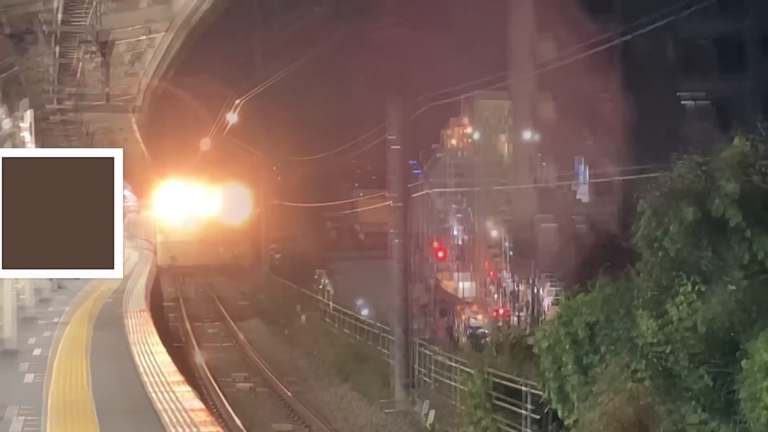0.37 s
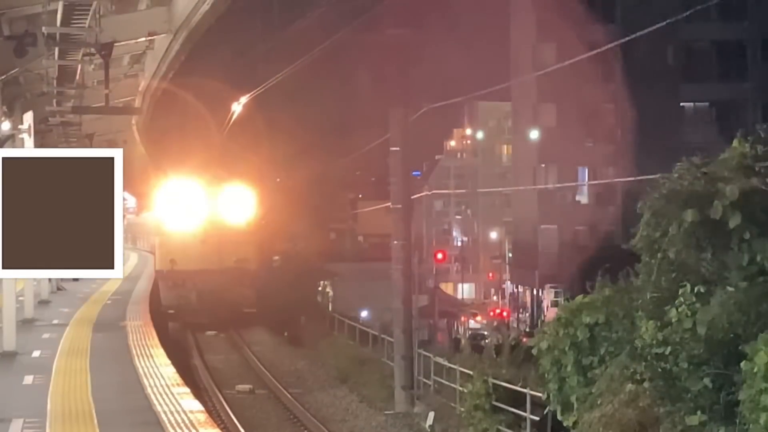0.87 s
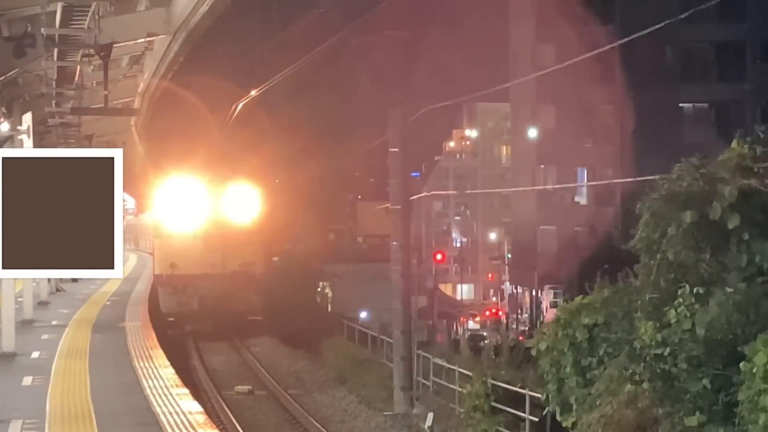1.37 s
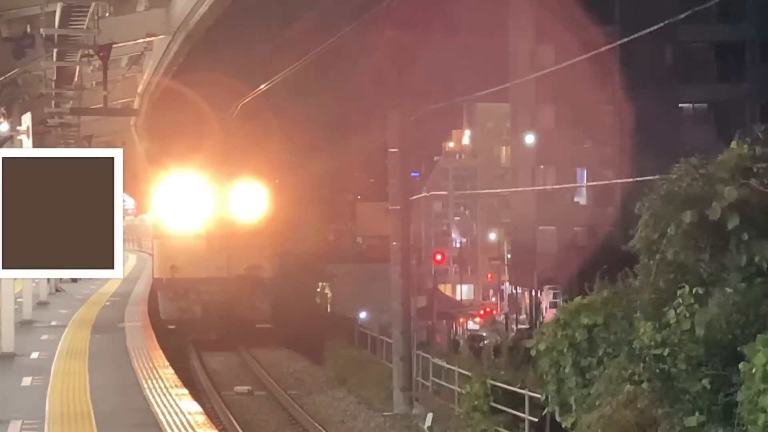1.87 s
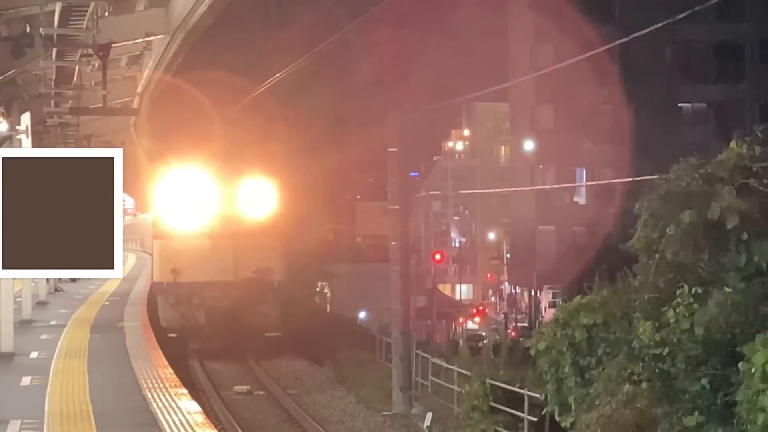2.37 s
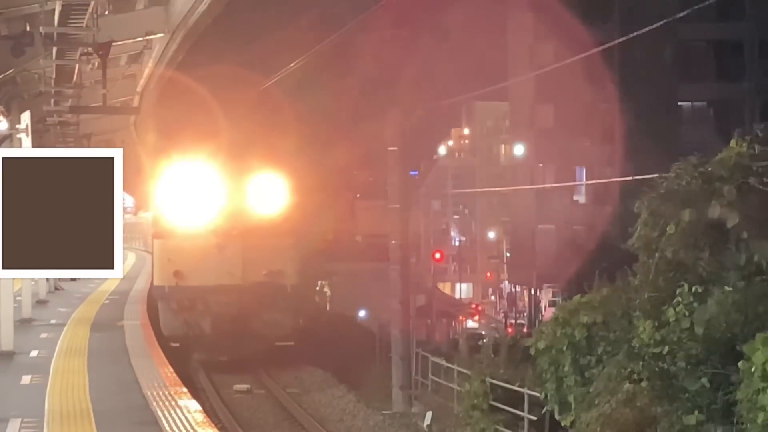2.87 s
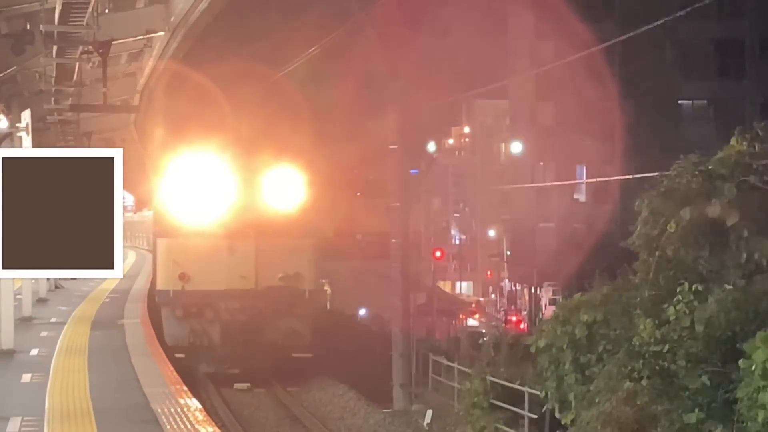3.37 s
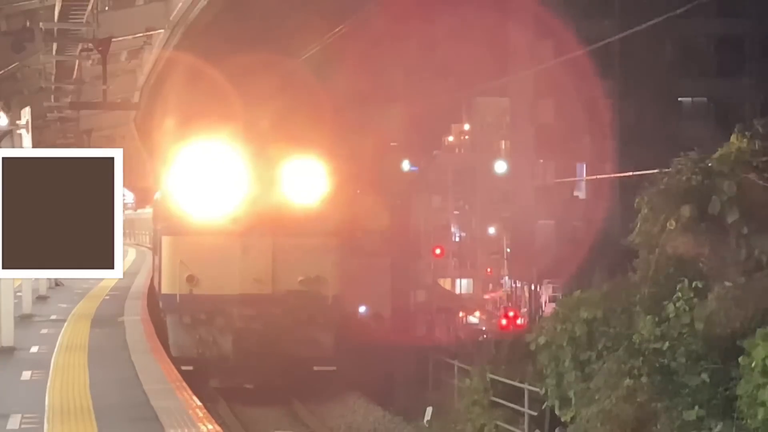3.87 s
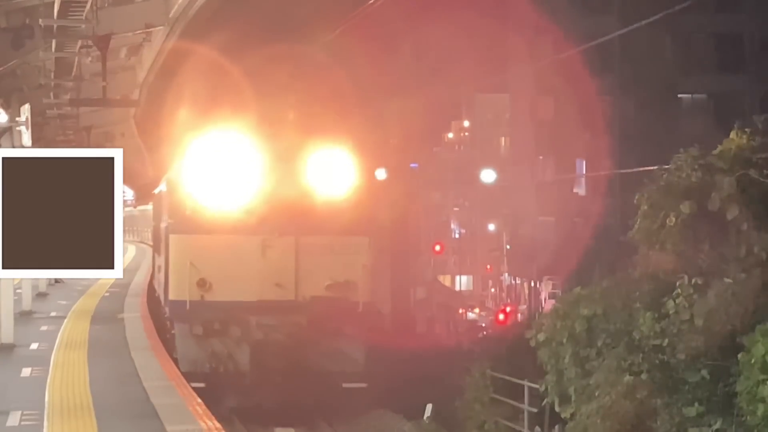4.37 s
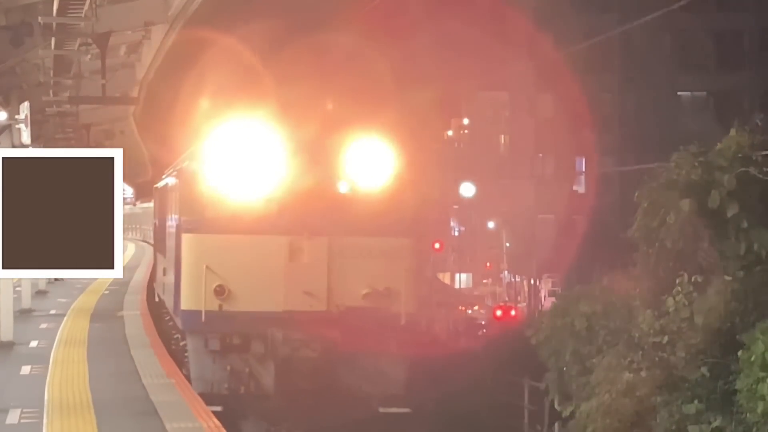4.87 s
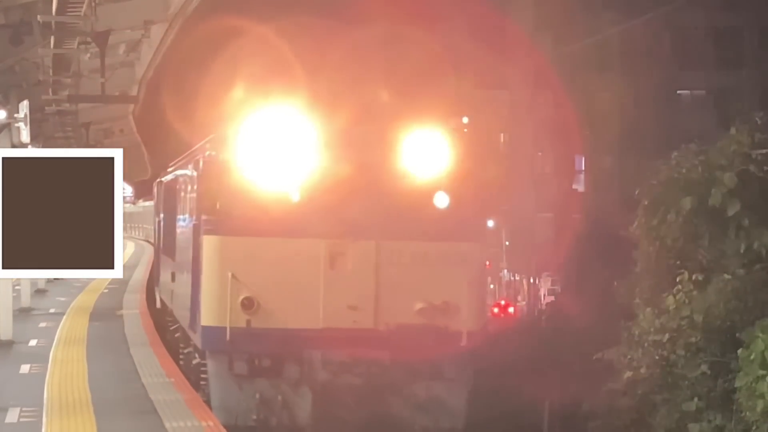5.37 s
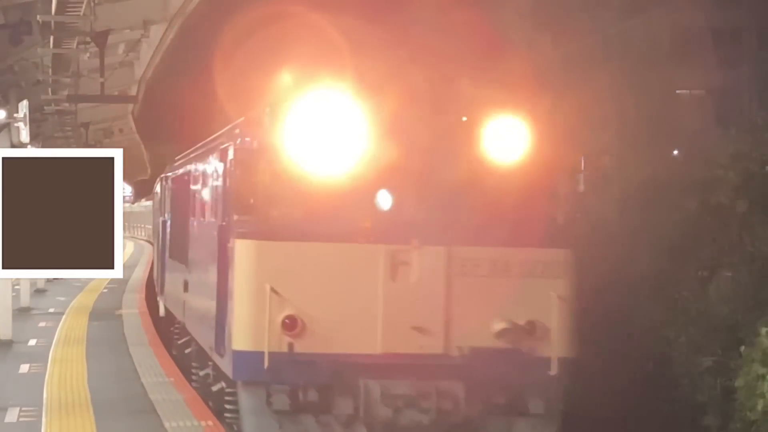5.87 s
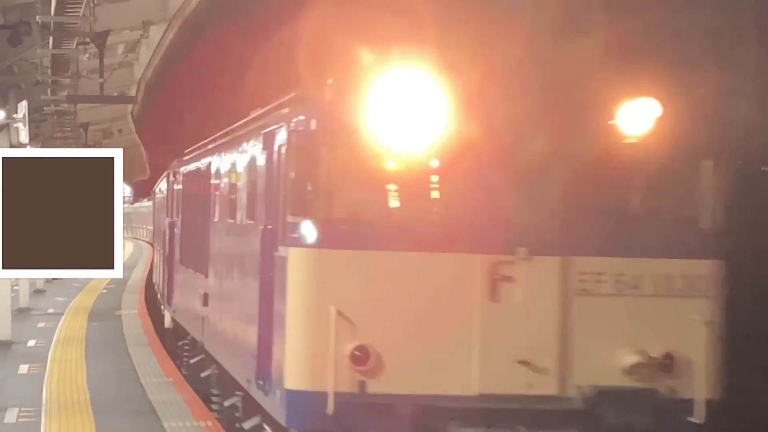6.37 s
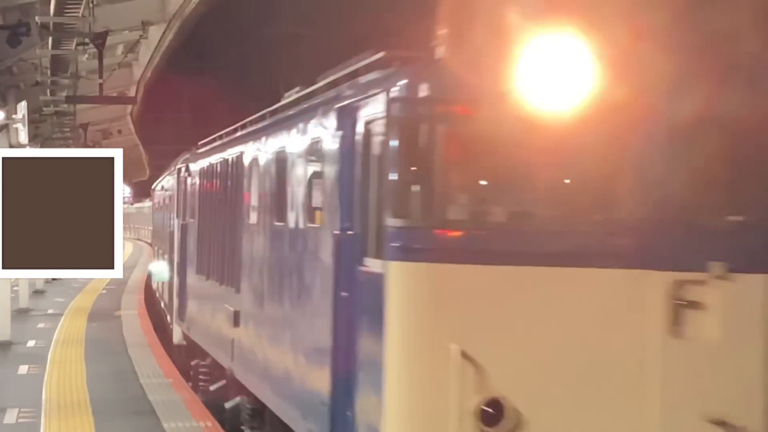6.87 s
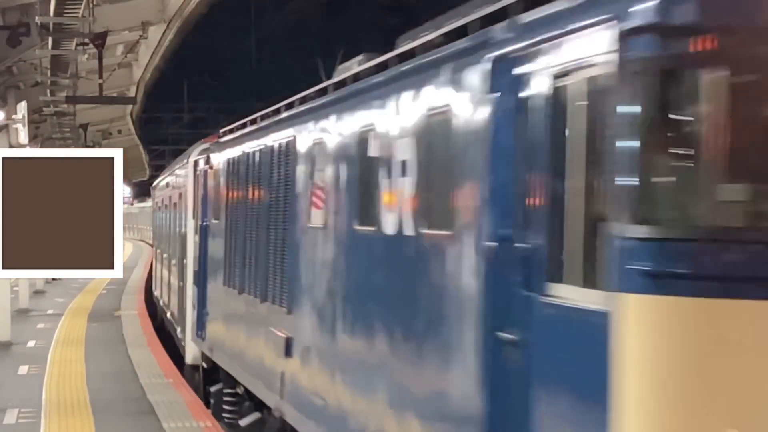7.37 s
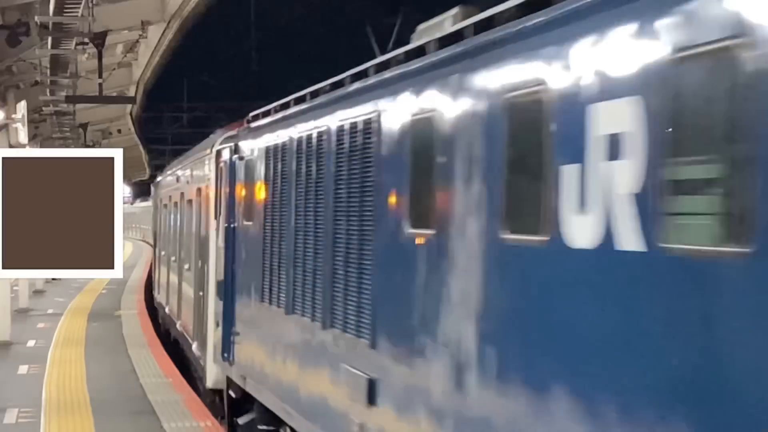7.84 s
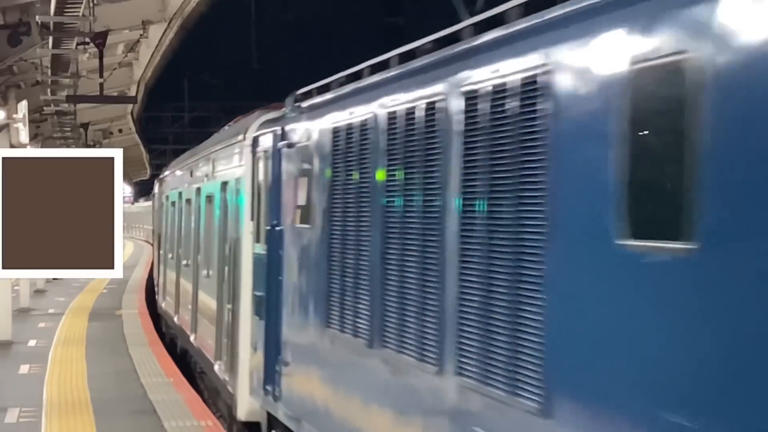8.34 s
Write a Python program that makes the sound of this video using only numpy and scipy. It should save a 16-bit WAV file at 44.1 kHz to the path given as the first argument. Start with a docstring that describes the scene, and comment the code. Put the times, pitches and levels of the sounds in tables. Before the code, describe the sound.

A quiet, humming station for a fraction of a second, a tiny dropout, then an electric locomotive fades in and slowly nears. Rumble, roar and hiss build over wavering motor hum. A double clack rings early, a dense clattering cluster follows midway, then growling bogies and faint whine pass close to a stereo microphone on a roofed platform.

```python
"""Electric locomotive approaching a platform

A short moment of a still, humming station, then a brief cut; after it a heavy electric locomotive fades in
and rolls slowly towards a pair of close microphones at night.
Coloured noise makes the wheels and rails rumble, roar and hiss ever louder. Unsteady tones make motors,
blower and gears hum, whine and sing. Blows ring the rail at its joints, the platform roof answers,
and the loudest peaks are flattened."""
import sys
import numpy as np
from scipy import signal
from scipy.fft import rfft, irfft, next_fast_len
from scipy.io import wavfile
from scipy.ndimage import uniform_filter1d, map_coordinates

SR = 44100
rng = np.random.default_rng(int(sys.argv[2]) if len(sys.argv) > 2 else 0)


def volts(x):
    """Linear amplitude factor 10**(x/20) for a level x in dB, scalar or array-like."""
    e = np.asarray(x, float) / 20
    return 10 ** e


def log_audio(samples):
    """Write samples as a 16-bit WAV file to the path given in sys.argv[1]."""
    # one column per channel
    frames = np.atleast_2d(samples).T
    # limit to full scale, then quantise
    limited = np.clip(frames, -1, 1)
    pcm = np.round(limited * 32767).astype(np.int16)
    wavfile.write(sys.argv[1], SR, pcm)


N = 373968
T = np.arange(N) / SR  # time of each sample in s
CUT_START_S, CUT_END_S = 0.18, 0.1945
AFTER_CUT = T > (CUT_START_S + CUT_END_S) / 2


def unit(x):
    """Scales a sound to an average strength (rms) of 1."""
    return x / np.sqrt(np.mean(x ** 2) + 1e-20)


def along(points, hz):
    """Reads a (f/Hz, value) table between its points, on a log frequency axis."""
    f, value = np.transpose(points)
    return np.interp(np.log(hz + 1), np.log(f + 1), value)


def curves(rows):
    """Gives one value per sample for each column after the time."""
    s, *columns = np.transpose(rows)
    return [np.interp(T, s, column) for column in columns]


def wobble(rate, size=N):
    """A smooth random curve through `rate` random points a second."""
    coarse = np.arange(0, size + 32, 32)
    knots = rng.standard_normal(int(size * rate / SR) + 4)
    return np.interp(np.arange(size), coarse, map_coordinates(knots, [coarse * rate / SR]))


def inside(t, start_s, end_s, edge_s):
    """1 between two times, 0 outside, with sloping edges."""
    return np.clip(np.minimum(t - start_s, end_s - t) / edge_s, 0, 1)


# How alike left and right noise are: (f/Hz, likeness from 0 to 1)
LIKENESS = [(60, 0.97), (130, 0.97), (290, 0.92), (640, 0.76), (1400, 0.47), (3100, 0.061), (5000, 0.32),
            (6200, 0.29), (6800, 0.86), (8300, 1), (15000, 0.54)]


def rush(spectra, patchy_db):
    """One stereo noise with randomly louder patches, coloured by each spectrum in turn, rms 1."""
    z = signal.stft(rng.standard_normal((2, N)), nperseg=512)[2]
    patches = uniform_filter1d(rng.standard_normal(z.shape[1:]), size=5, axis=0)
    patches = unit(uniform_filter1d(patches, size=10, axis=1))
    noise = signal.istft(z * volts(patchy_db * patches), nperseg=512)[1][:, :N]
    size = next_fast_len(N + SR // 5)
    hz = np.fft.rfftfreq(size, 1 / SR)
    # the shared middle and the opposite-signed side mix to give the wanted likeness
    turn = np.arccos(np.clip(along(LIKENESS, hz), -1, 1)) / 2
    mid, side = rfft(noise, size) * [np.cos(turn), np.sin(turn)]
    pair = np.array([mid + side, mid - side])
    return [unit(irfft(pair * volts(along(spectrum, hz)), size)[:, :N]) for spectrum in spectra]


def hum(rows, blur_hz, flutter_db, order=1):
    """An unsteady tone from (t/s, f/Hz, level/dB) rows; its pitch and strength wander."""
    s, hz, db = np.transpose(rows)
    out, first = np.zeros(N), round(s[0] * SR)
    t = np.arange(first, min(round(s[-1] * SR), N)) / SR
    sounding = inside(t, s[0], s[-1], edge_s=0.086)
    pitch_hz = np.interp(t, s, hz) + blur_hz * wobble(30, size=len(t))
    phase = 2 * np.pi * np.cumsum(pitch_hz) / SR
    level_db = np.interp(t, s, db) + flutter_db * wobble(12, size=len(t))
    out[first:][:len(t)] = np.sqrt(2) * sounding * volts(level_db) * np.sin(order * phase)
    return out


# Colour of the still station's noise: (f/Hz, relative level/dB)
STATION_COLOUR = [(21, -44), (35, -6), (119, -13), (247, -2.5), (293, -17), (339, -9), (365, -26),
                  (403, -8), (433, -32), (501, -10), (540, -29), (581, -16), (923, -29), (994, -27.5),
                  (12000, -64.5), (15600, -104), (22000, -120)]
# Hums of station equipment: (f/Hz, level/dB)
STATION_HUMS = [(247.6, -45), (328.4, -43), (393.0, -55), (500.6, -55)]


def station():
    """The still station: soft coloured noise and steady sine hums from equipment."""
    still = volts(-34) * rush([STATION_COLOUR], patchy_db=2.0)[0]
    for hz, db in STATION_HUMS:
        still = still + np.sqrt(2) * volts(db) * np.sin(2 * np.pi * hz * T)
    return still


# How the train grows louder: (t/s, treble level/dB, bass level/dB), about 0 dB alongside
APPROACH = [(.2, -20.5, -11), (.7, -22, -14), (1.3, -22, -13.5), (2.0, -20.5, -13.5), (2.4, -19, -12),
            (2.9, -18.5, -9), (3.6, -16, -9.5), (4.4, -14.5, -5.5), (5.0, -12.5, -4.5), (5.45, -12, -6.5),
            (5.85, -9, -2.5), (6.1, -7.5, -1), (6.6, -5.5, -0.5), (7.3, -3.5, 0), (7.38, -6.5, -1.5),
            (7.5, -3, -1), (7.7, -2, 1), (8.0, -2.5, -1.5), (8.25, -1, -1.5), (8.48, -1.5, -0.5)]


def approach():
    """The growing treble and bass levels in dB, which each layer follows in its own measure."""
    return curves(APPROACH)


def come_near(far, close):
    """Fades from the far colour to the close one as the locomotive comes alongside."""
    near = np.clip((T - 4.5) / 3.03, 0, 1)
    return (1 - near) * far + near * close


# Colour of the deepest rolling noise: (f/Hz, relative level/dB)
GROUND_COLOUR = [(13, -45), (22, -37), (54, 8), (110, 0.5), (140, -46), (240, -120)]


def ground(bass_db):
    """The deepest rolling noise, from rough wheels on rough rails."""
    level_db = -20 + 0.85 * bass_db + 1.0 * wobble(5)
    return volts(level_db) * rush([GROUND_COLOUR], patchy_db=-1.0)[0]


# Colour of the rumble far off and close by: (f/Hz, relative level/dB)
RUMBLE_FAR = [(65, -18), (110, -3), (140, -4.5), (173, 0.5), (229, -3), (252, -10), (286, -6), (380, -16),
              (490, -33.5), (840, -120)]
RUMBLE_CLOSE = [(65, -29), (110, 0), (140, -5.5), (183, -4.5), (226, -7), (275, -8), (317, -3.5),
                (380, -9.5), (490, -10.5), (840, -120)]


def rumble(bass_db):
    """Low rolling noise from wheel and rail roughness, with a slow and a quicker unsteadiness."""
    level_db = -14 + 0.83 * bass_db + 1.4 * wobble(4.087) + 0.54 * wobble(14)
    return volts(level_db) * come_near(*rush([RUMBLE_FAR, RUMBLE_CLOSE], patchy_db=0.07))


# Colour of the roar far off and close by: (f/Hz, relative level/dB)
ROAR_FAR = [(190, -19), (320, -13.5), (408, -7.5), (483, -6.5), (560, -6), (630, -4.5), (661, -9),
            (759, -5), (966, -14), (1250, -12.5), (1580, -20), (1870, -17.5), (2200, -18.5), (2860, -57),
            (4840, -120)]
ROAR_CLOSE = [(190, -8), (320, -5.5), (361, -10), (640, -9.5), (746, -8.5), (928, -12.5), (1370, -12.5),
              (1580, -17), (1730, -14.5), (2200, -18.5), (2860, -37), (4840, -120)]


def roar(treble_db, jolts):
    """The middle of the rolling noise, shaken slightly by uneven track."""
    level_db = -15.5 + 0.86 * treble_db + 0.19 * jolts
    return volts(level_db) * come_near(*rush([ROAR_FAR, ROAR_CLOSE], patchy_db=1.23))


# Colour of the hiss far off and close by: (f/Hz, relative level/dB)
HISS_FAR = [(1800, -120), (2000, -5), (2400, -1), (2600, -3), (2820, -1.5), (3100, -5), (3550, -7),
            (3780, -3.5), (4000, -7.5), (5000, -8.5), (5900, -13), (7000, -13.5), (8300, -15.5),
            (9600, -16), (11000, -21.5), (12200, -23.5), (13000, -29), (15300, -30), (16000, -120)]
HISS_CLOSE = [(1800, -120), (2000, -4), (2400, -2), (2900, -3.5), (3500, -5), (3720, -3), (3950, -3),
              (4300, -5), (5200, -5.5), (5900, -11.5), (7000, -12.5), (8300, -14.5), (9600, -15.5),
              (11000, -19), (12500, -23), (13500, -37), (15500, -23), (16000, -120)]


def hiss(treble_db, jolts, scrape):
    """The treble of the rolling noise; scraping at the joints makes it swell."""
    strength = volts(-22.5 + treble_db + 0.55 * jolts + 0.6 * wobble(20))
    return np.hypot(strength, scrape) * come_near(*rush([HISS_FAR, HISS_CLOSE], patchy_db=1.35))


# Times when the blower note swells or dips: (start t/s, end t/s, level change/dB)
BLOWER_CHANGES = [(5.873, 6.042, 12), (6.262, 6.693, 6.5), (7.737, 7.84, 8), (8.093, 8.297, -1)]


def blower(treble_db):
    """A rough blower note at one pitch, quickly wavering, that follows the approach and swells or dips."""
    steady = [(CUT_END_S, 760, -30), (N / SR, 760, -30)]
    change_db = sum(db * inside(T, start, end, edge_s=0.019) for start, end, db in BLOWER_CHANGES)
    waver = 0.7 + 0.6 * wobble(80)
    return volts(0.64 * treble_db + change_db) * waver * hum(steady, blur_hz=16, flutter_db=0.0)


# Motor hum: (t/s, f/Hz, level/dB over its share of the bass)
MOTOR = [(.3, 179.6, -1), (1.5, 176.9, 1), (1.9, 181.8, -15), (2.4, 181.3, 3), (3.2, 178, -7.5),
         (4.4, 177.6, 1.5), (5.3, 179.6, -5.5), (6.0, 179.6, -3), (6.9, 179.6, -21), (7.4, 182.7, -12),
         (8.0, 181.7, 3.5), (8.48, 182.9, 3)]


def motors(bass_db):
    """The motors hum a wandering low note that grows with the bass."""
    return volts(bass_db - 19.5) * hum(MOTOR, blur_hz=3.14, flutter_db=0.5)


# Low drone of the bogies (the wheel frames): (t/s, f/Hz, level/dB before flutter)
BOGIE = [(.3, 74.8, -38), (1.0, 74.8, -31), (1.5, 75.3, -34), (2.1, 76, -25), (3.3, 74.7, -32),
         (3.9, 77.9, -37)]


def bogies():
    """The bogies drone on an unsteady low note while far off."""
    return hum(BOGIE, blur_hz=3.9, flutter_db=3.5)


# Sagging tones: (start t/s, end t/s, start f/Hz, end f/Hz, level/dB before flutter)
DRONES = [(0.703, 1.604, 164, 157.7, -31), (2.932, 4.79, 146.6, 135.6, -25),
          (5.476, 6.4, 157.7, 156.2, -30.5)]


def drones():
    """Tones that sag in pitch, perhaps from the running gear, each with a fainter octave above."""
    out = np.zeros(N)
    for start, end, start_hz, end_hz, db in DRONES:
        glide = [(start, start_hz, db), (end, end_hz, db)]
        out += hum(glide, blur_hz=0.19, flutter_db=2.6)
        out += volts(-13.5) * hum(glide, blur_hz=0.7, flutter_db=0.5, order=2)
    return out


# Wheel blows at joints: (t/s, peak level/dB, favoured f/Hz, time for the crunch to fall 60 dB/s)
CLACKS = [(2.268, -25, 760, 0.03), (2.275, -9, 620, 0.042), (2.243, -13, 187.2, 0.072),
          (2.282, -13, 163, 0.067), (2.293, -21, 310, 0.073), (2.3, -8.5, 203, 0.1),
          (2.578, -19, 550, 0.087), (2.581, -8, 201.8, 0.14), (5.15, -17.5, 1170, 0.15),
          (5.156, -19, 2150, 0.18), (5.164, -11.5, 804, 0.18), (5.176, -4, 430, 0.069),
          (5.181, -13, 760, 0.15), (5.185, -7.5, 450, 0.19), (5.193, -15, 470, 0.14),
          (5.193, -11, 820, 0.057), (5.203, -10, 450, 0.085), (5.208, -4.5, 900, 0.02),
          (5.204, -4, 156, 0.072), (5.228, -16, 600, 0.13), (5.419, -21, 910, 0.035),
          (5.465, -17, 780, 0.12), (5.488, -13, 705, 0.23), (5.483, -30, 2220, .2),
          (5.492, -13.5, 428, 0.3), (5.492, -18, 1180, 0.31), (5.522, -16.5, 900, 0.27),
          (5.534, -10, 330, 0.15), (5.538, -8.5, 159, 0.24), (5.55, -10, 170, 0.21), (5.583, -10, 160, .08),
          (5.63, -9.5, 200, 0.074), (5.873, -12.5, 390, 0.28), (5.907, -12, 220, .08),
          (7.219, -10, 703, 0.044)]
# Ways the rail rings: (f/Hz, width/Hz, level/dB)
RAIL = [(156, 85, -2), (210, 75, -14.5), (320, 33, 6.5), (383, 43, 8), (470, 72, 3), (550, 28, 1.5),
        (695, 53, 0.5), (788, 98, -3), (900, 81, -0.5), (1087, 80, -5), (1276, 195, -7), (1870, 320, -4),
        (2340, 130, -5)]


def clacks():
    """Each wheel drop is a click plus a gritty crunch, ringing the rail modes near its pitch."""
    out, t, size = np.zeros(N + SR), np.arange(SR // 4) / SR, SR // 2
    f = np.fft.rfftfreq(size, 1 / SR)
    for s, db, pitch_hz, t60 in CLACKS:
        blow = (t == 0) + 0.14 * rng.standard_normal(len(t)) * volts(-60 * t / t60)
        rail = 0
        for k, (mode_hz, width_hz, level_db) in enumerate(RAIL):
            favour_db = -45 * np.log2(mode_hz / pitch_hz) ** 2
            damping = 1j * f * width_hz
            ring = damping / (mode_hz ** 2 - f ** 2 + damping)
            rail = rail + (-1) ** k * volts(level_db + favour_db) * ring
        # the contact mostly excites a band round its pitch
        ratio = f / pitch_hz
        contact = (1j * ratio / (1 + 0.9j * ratio - ratio ** 2)) ** 2
        knock = irfft(rfft(blow, size) * rail * contact, size)[:len(t)]
        out[round(s * SR):][:len(t)] += volts(db) * knock / np.abs(knock).max()
    return out[:N]


# How long the roof's answer lasts: (f/Hz, time to fall 60 dB/s)
CANOPY = [(200, 0.097), (1000, 0.4), (8000, 0.21)]


def canopy(x):
    """The platform roof answers with a noise tail; each frequency dies at its own speed."""
    hz, t, z = signal.stft(rng.standard_normal((2, SR // 2)), SR, nperseg=256)
    tail = signal.istft(z * volts(-60 * t / along(CANOPY, hz)[:, None]), SR, nperseg=256)[1]
    delayed = np.pad(x, (500, 0))[None]  # 500 samples, about 11 ms
    return signal.fftconvolve(delayed, tail / np.linalg.norm(tail[0]), axes=1)[:, :N]


# Wheel treads scrape at the joints: (t/s, level/dB before its soft start and decay)
SCRAPES = [(2.262, -30.5), (2.578, -54), (5.151, -23.5), (5.18, -26), (5.205, -31.5), (5.24, -37),
           (5.487, -38), (5.541, -32), (5.88, -36), (7.219, -38), (8.36, -15)]


def scraping():
    """Strength of the scraping: each scrape starts softly, then falls at a rate of 60 dB in 0.17 s."""
    out, t = np.zeros(N + SR), np.arange(SR // 4) / SR
    for s, db in SCRAPES:
        out[round(s * SR):][:len(t)] += volts(db - 60 * t / 0.17) * (1 - np.exp(-t / 0.006))
    return out[:N]


# Low throb nearby: (t/s, f/Hz, level/dB before roughening)
THROB = [(4.0, 82.6, -25), (4.7, 83.4, -25.5), (5.3, 68.8, -19), (6.3, 62, -16.5), (7.05, 73.3, -21.5),
         (7.6, 62.68, -16), (8.48, 67, -34)]


def throb():
    """A rough low throb: a deep tone whose strength shakes at random."""
    return (0.6 + 0.3 * wobble(28)) * hum(THROB, blur_hz=8, flutter_db=1.0)


# Gear whine: (t/s, f/Hz, level/dB before roughening)
WHINE = [(5.5, 5360, -55), (6.5, 5360, -50), (7.0, 5360, -47), (7.3, 5358, -45), (7.6, 5362, -42),
         (7.9, 5355, -43), (8.1, 5310, -43), (8.4, 5300, -48)]


def gears():
    """Rough gear teeth smear a high whine; a tiny time shift places it further right."""
    whine = (0.5 + 0.75 * wobble(120)) * hum(WHINE, blur_hz=22, flutter_db=1.5)
    return np.array([np.roll(whine, 2), np.roll(whine, -2)])  # samples: late left, early right


# Surges of the growl: (t/s, level/dB before wobble)
GROWL = [(5.8, -30), (6.7, -29), (6.9, -14.5), (7.05, -22.5), (7.2, -14.5), (7.33, -11), (7.4, -28),
         (7.49, -10.5), (7.6, -27), (7.72, -13), (7.9, -16), (8.2, -15.5), (8.4, -16), (8.48, -12)]
# Its colour: (f/Hz, relative level/dB)
GROWL_COLOUR = [(110, -120), (140, -3), (170, -4.5), (215, -5.5), (250, -2), (330, -120)]


def growl():
    """The passing bogies growl in surges of low noise."""
    level_db = curves(GROWL)[0] + 1.4 * wobble(28)
    return (T > GROWL[0][0]) * volts(level_db) * rush([GROWL_COLOUR], patchy_db=0.0)[0]


# Faint ringing of wheel discs: (start t/s, end t/s, f/Hz, level/dB before roughening)
RINGS = [(7.8, 8.1, 4040, -42), (7.4, 8.4, 2815, -40), (8.17, 8.31, 2365, -34), (7.82, 7.97, 1375, -30)]


def wheel_rings():
    """Wheel discs ring faintly and roughly, each on one blurred pitch."""
    out = np.zeros(N)
    for start, end, hz, db in RINGS:
        tone = hum([(start, hz, db), (end, hz, db)], blur_hz=14, flutter_db=2)
        out += (0.6 + 0.6 * wobble(30)) * tone
    return out


# A wheel sings briefly: (t/s, f/Hz, level/dB before flutter)
SING = [(7.81, 1702, -46), (7.865, 1702, -39), (7.885, 1703, -27), (7.915, 1705, -30), (7.945, 1705, -25),
        (7.965, 1700, -29), (8.0, 1690, -36), (8.07, 1685, -44)]


def singing_wheel():
    """A wheel sings briefly on a slightly trembling note."""
    return (1 + 0.25 * wobble(50)) * hum(SING, blur_hz=6, flutter_db=1.5)


def scene():
    """The still station, then the train's rolling noise, machinery and joints."""
    treble_db, bass_db = approach()
    jolts = wobble(9)  # uneven track shakes roar and hiss together
    rolling = ground(bass_db) + rumble(bass_db) + roar(treble_db, jolts)
    rolling = rolling + hiss(treble_db, jolts, scraping()) + growl()
    background = np.where(AFTER_CUT, rolling, station())
    machinery = blower(treble_db) + motors(bass_db) + bogies() + drones() + throb()
    machinery = machinery + gears() + wheel_rings() + singing_wheel()
    knocks = clacks()
    return background + machinery + knocks + volts(-11.5) * canopy(knocks)


# Level of left over right: (f/Hz, level difference/dB)
LEVEL_DIFFERENCE = [(60, -1.5), (150, 0.0), (380, 1), (950, 2), (2380, 1.5), (5980, 0), (15000, -0.5)]
# Phase lead of left over right; negative values mean right is ahead, as in most of the treble:
# (f/Hz, phase/radians)
PHASE_LEAD = [(300, 0), (1200, .2), (1750, 0), (2700, 1.7), (3800, 2.4), (5000, 3.4), (5500, 2.9),
              (6200, 1), (6900, 0), (7600, -.5), (8300, -2.2), (9600, -3.5), (10700, -5.7), (12200, -6.5),
              (12850, -9.4), (14350, -9.4), (15100, -12.5)]


def microphones(dry):
    """Two spaced, unequal microphones; each takes half of the level and phase differences."""
    size = next_fast_len(N + SR // 2)
    hz = np.fft.rfftfreq(size, 1 / SR)
    phase = np.interp(hz, *np.transpose(PHASE_LEAD))
    half = volts(along(LEVEL_DIFFERENCE, hz) / 2) * np.exp(0.5j * phase)
    return irfft(rfft(dry, size) * np.array([half, 1 / half]), size)[..., :N]


def roll_off(x):
    """The treble ends steeply here."""
    return signal.sosfilt(signal.butter(12, 17080, fs=SR, output="sos"), x)


def record(dry):
    """Microphones, a short cut followed by a fade-in, and flattened peaks."""
    x = microphones(dry)
    fade_db = np.interp(T, [CUT_END_S, 0.77], [-7.5, 0])
    x = x * volts(np.where(AFTER_CUT, fade_db, 0))
    outside_cut_s = np.maximum(CUT_START_S - T, T - CUT_END_S)
    x = x * np.clip(outside_cut_s / 0.003 + 1, 0.02, 1)  # near silence, with edges of about 3 ms
    x = x / (1 + np.abs(x) ** 8) ** (1 / 8)  # bends peaks over just below full scale
    return roll_off(x)


dry = scene()
out = record(dry)
log_audio(out)
```